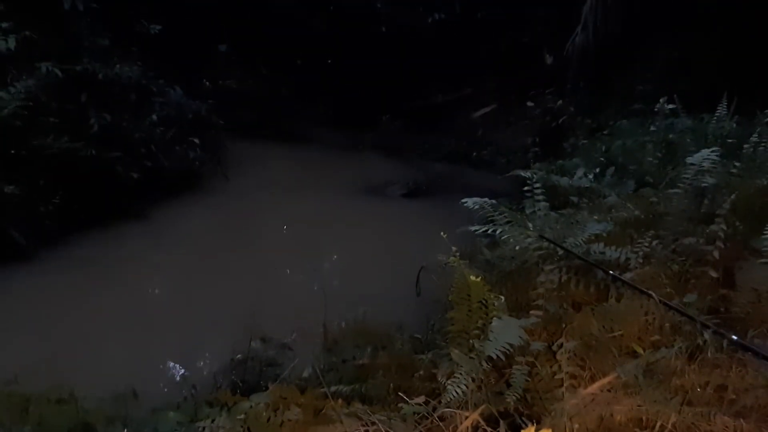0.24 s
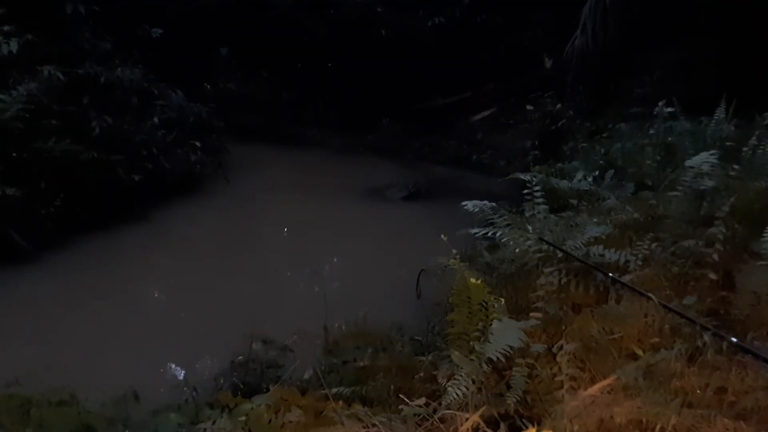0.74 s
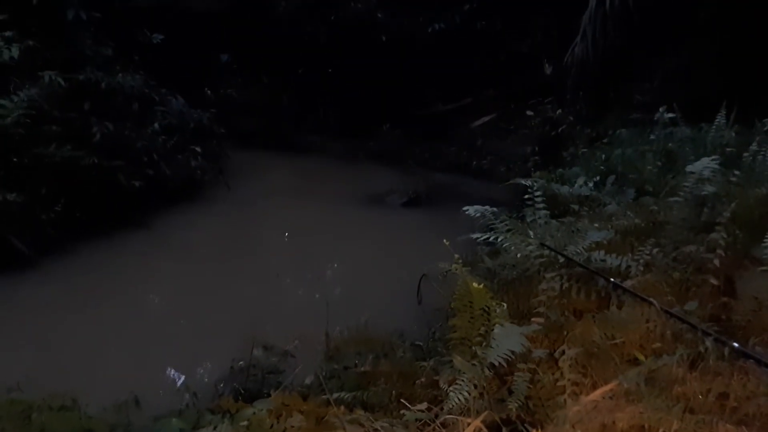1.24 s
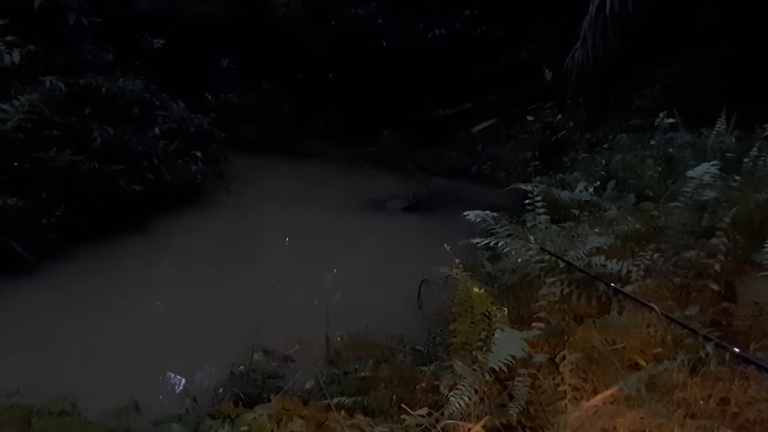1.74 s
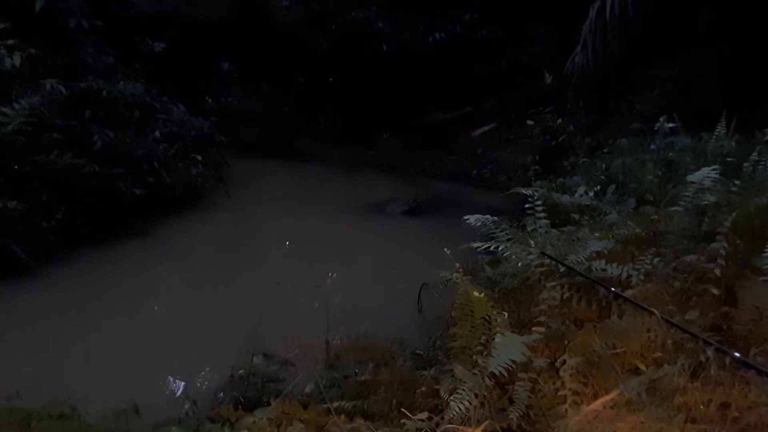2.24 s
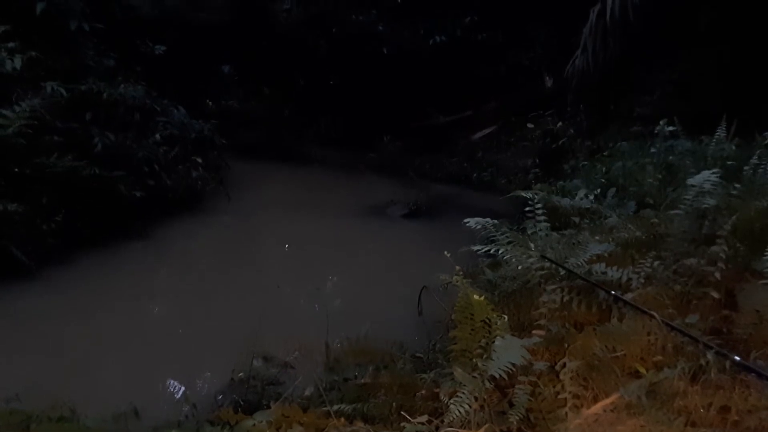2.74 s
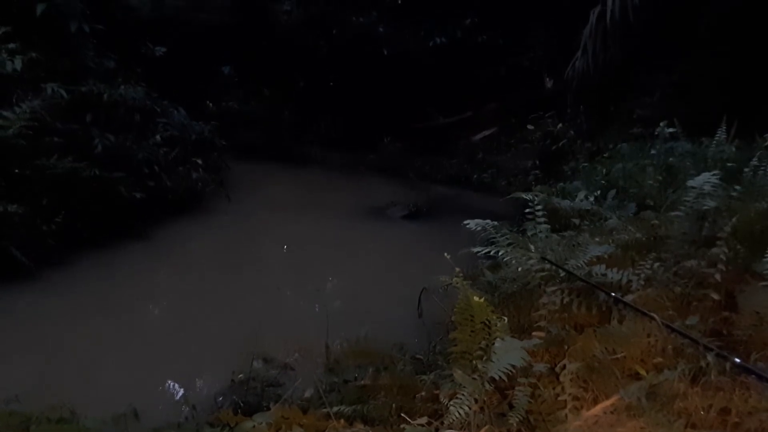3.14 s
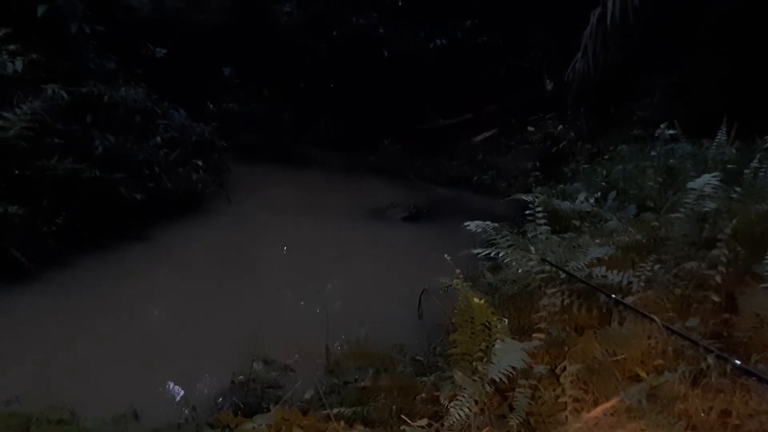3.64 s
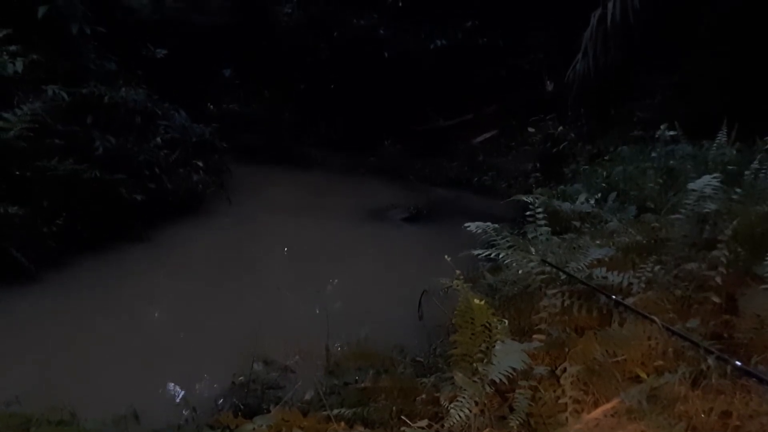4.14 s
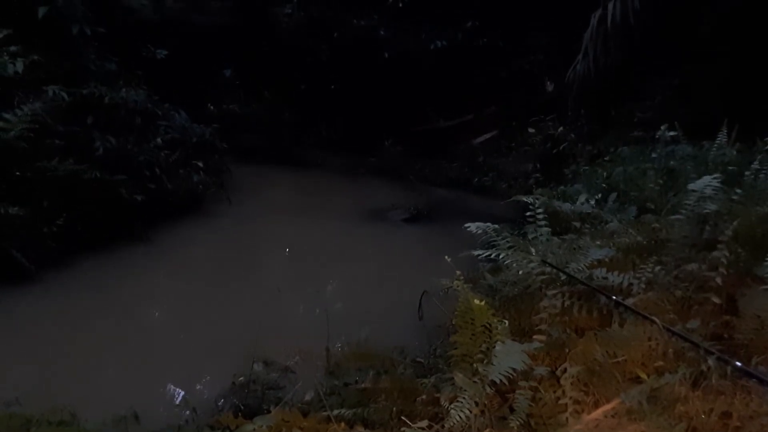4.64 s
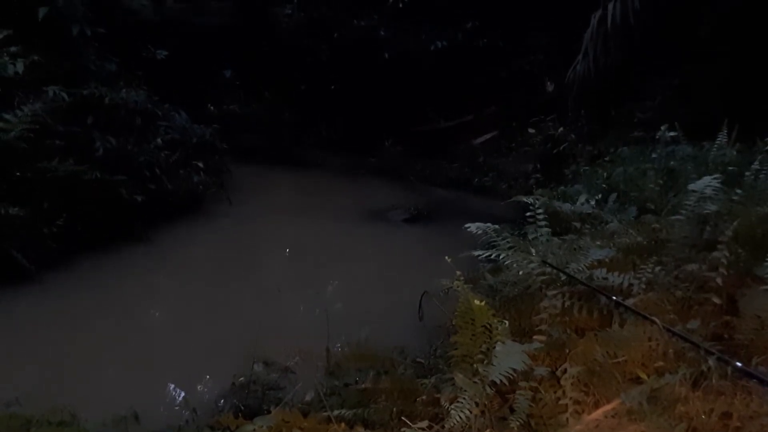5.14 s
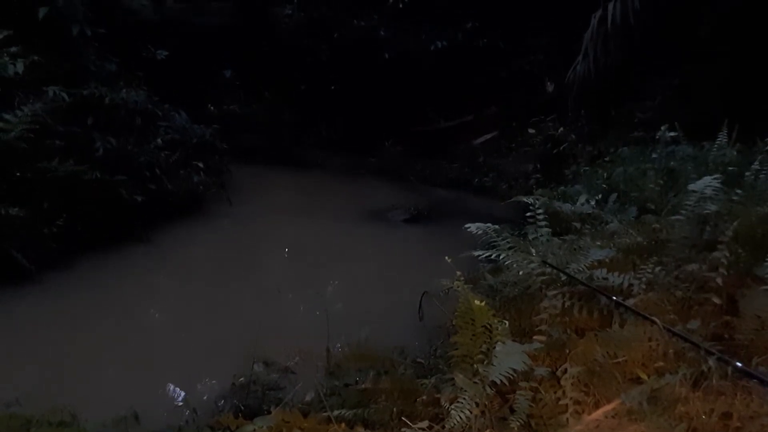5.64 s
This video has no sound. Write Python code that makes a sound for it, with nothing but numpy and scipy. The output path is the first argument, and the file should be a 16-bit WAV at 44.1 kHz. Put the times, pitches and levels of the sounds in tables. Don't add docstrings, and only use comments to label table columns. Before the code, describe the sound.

A dark waterside grove at night, heard in wide stereo. A low, reedy insect drone and high cricket trills run throughout, with fast chirps and raspy pulses. Around one second a close caller gives six dry rattles, left of centre; from four seconds short two-note frog pips come regularly, getting stronger to the end. A very faint engine rumbles far away.

```python
import sys
import numpy as np
from scipy import signal
from scipy.fft import rfft, irfft
from scipy.io import wavfile
from scipy.ndimage import map_coordinates

SR = 44100
rng = np.random.default_rng(int(sys.argv[2]) if len(sys.argv) > 2 else 0)


def pcm_store(signal):
    levels = np.round(np.clip(np.atleast_2d(signal), -1, 1) * 32767)
    wavfile.write(sys.argv[1], SR, levels.astype(np.int16).T)


def level_to_linear(level):
    exponent = np.asarray(level, float) / 20
    return 10 ** exponent


N = 260190


def in_time(rows):
    s, *columns = np.transpose(rows)
    return [np.interp(np.arange(N) / SR, s, c) for c in columns]


def at_hz(points, hz):
    points = np.array(points)
    return np.interp(np.log(hz + 1), np.log(points[:, 0]), points[:, 1])


def rms_one(x):
    return x / np.sqrt(np.mean(x ** 2) + 1e-20)


def drift(rate):
    coarse = np.arange(0, N + 32, 32)
    slow = map_coordinates(rng.standard_normal(3000), [coarse * rate / SR], order=3)
    return np.interp(np.arange(N), coarse, rms_one(slow))


def phrases(rows, fade_db_per_s, rest_db):
    t = np.arange(N) / SR
    held = []
    for s, length_s, db in rows:
        outside_s = np.maximum(0, np.maximum(s - t, t - s - length_s))
        held.append(db - fade_db_per_s * outside_s)
    return np.maximum(np.max(held, axis=0), rest_db)


def place(x, pan_db, lag_ms):
    at = np.arange(len(x))
    late = np.interp(at - np.round(lag_ms * SR / 1000), at, x)
    return np.array([late * level_to_linear(pan_db / 2), x * level_to_linear(-pan_db / 2)])


def grove(x, gap_s):
    t60_s = 0.7
    t = np.arange(SR) / SR
    cloud = rng.standard_normal((2, SR)) * level_to_linear(-60 * t / t60_s) * (t > gap_s)
    unit_energy = rms_one(cloud) / np.sqrt(SR)
    return signal.fftconvolve(x, unit_energy, axes=1)[:, :N]


def shaped_noise(spectrum, likeness):
    hz = np.fft.rfftfreq(N, 1 / SR)
    mid, side = rfft(rng.standard_normal((2, N)))
    alike = np.clip(at_hz(likeness, hz), -1, 1)
    both = np.sqrt(1 + alike) * mid + np.sqrt(1 - alike) * side * [[1], [-1]]
    return rms_one(irfft(both * level_to_linear(at_hz(spectrum, hz)), N))


def chorus(singers, level_db, wander_rate, flicker_db, wet_db):
    out = 0
    for carrier_hz, per_s, decay, glide_hz, wander_hz, db, pan_db, lag_ms in singers:
        stroke = np.cumsum(per_s * (1 + .02 * drift(4.0))) / SR % 1
        hz = carrier_hz + glide_hz * (stroke - .3) + wander_hz * drift(wander_rate)
        swell = np.sin(np.pi * stroke) ** 1.75 * np.exp(-decay * stroke)
        voice = rms_one(swell * np.sin(2 * np.pi * np.cumsum(hz) / SR))
        out = out + place(voice * level_to_linear(db + flicker_db * drift(9.0)), pan_db, lag_ms)
    direct = rms_one(out) * level_to_linear(level_db + 5.0) / np.sqrt(1 + level_to_linear(2 * wet_db))
    return np.array([direct, level_to_linear(wet_db) * direct])


def glides(events, from_hz, to_hz, length_s, lag_ms, wet_db, db=0.0, after_s=0.0):
    out = np.zeros((2, N + SR))
    u = np.linspace(0, 1, round(length_s * SR))
    change = rng.normal(0, 0.006, (len(events), 1))
    shape = np.sin(np.pi * u) ** 2 * np.exp(1 - 2 * u)
    for (s, peak_db, pan_db), detune in zip(events, change):
        hz = (from_hz + (to_hz - from_hz) * u) * (1 + detune)
        note = np.sin(2 * np.pi * np.cumsum(hz) / SR) * shape
        at = round((s + after_s) * SR)
        out[:, at:at + len(u)] += place(note * level_to_linear(peak_db + db), pan_db, lag_ms)
    return np.array([out[:, :N], level_to_linear(wet_db) * out[:, :N]])


def strokes(bursts, gap_s, pan_db, uneven_db, growth_db):
    luck = rng.normal(0, 1, (len(bursts), 8, 3))
    rows = []
    for i, (s, length_s, db) in enumerate(bursts):
        for k in range(round(length_s / gap_s) + 1):
            timing, strength, side = luck[i, k]
            start_s = s + gap_s * (k + .06 * timing * (k > 0))
            level_db = db + growth_db * k + uneven_db * strength
            rows.append((start_s, level_db, pan_db + 2.4 * side))
    return rows


# time_s, level_db
RUMBLE_LEVEL = [(0, -71.5), (.9, -75), (1.5, -68), (2.2, -74), (2.85, -72.5), (3.5, -72), (3.9, -74),
                (4.5, -74.5), (4.9, -71.5), (5.9, -71.5)]
# frequency_hz, density_db
RUMBLE_SPECTRUM = [(15, -53.5), (25, -30), (46, -5.5), (65, 1), (134, -9), (409, -24.5), (818, -36),
                   (1000, -35.5), (1300, -33.5), (2200, -120)]
# frequency_hz, left_right_likeness
LOW_LIKENESS = [(60, .9), (130, .62), (290, .36), (640, .05)]


def rumble():
    level_db = in_time(RUMBLE_LEVEL)[0] + 1.8 * drift(3.4)
    return level_to_linear(level_db) * shaped_noise(RUMBLE_SPECTRUM, LOW_LIKENESS) * level_to_linear([[-2.5], [2.1]])


# start_s, length_s, level_db
HUM_SWELLS = [(.36, 0.55, -71.5), (.97, 0.07, -66), (1.6, .08, -64.5), (1.85, 0.077, -66), (2.53, .85, -62),
              (3.8, 0.06, -67), (4.68, 0.04, -65), (5.0, .5, -71)]


def hum():
    line = np.sin(2 * np.pi * np.cumsum(63 + 1.58 * drift(2.9)) / SR)
    return place(line * level_to_linear(phrases(HUM_SWELLS, 110, rest_db=-74) - 5.5), -7.0, .01)


# start_s, length_s, level_db
BREEZE = [
    (0, .1, -88),
    (1.1, 1.2, -83),
    (4.75, 0.3, -79),
]
# frequency_hz, density_db
FERN_SPECTRUM = [(100, -34), (200, 0), (500, -3.5), (1000, -8.5), (1500, -43)]


def ferns():
    level_db = phrases(BREEZE, 30, rest_db=-100) + 2.5 * drift(5.1)
    return level_to_linear(level_db) * shaped_noise(FERN_SPECTRUM, LOW_LIKENESS)


# frequency_hz, density_db
FAR_SPECTRUM = [(950, -28.5), (1250, -3), (1900, 7), (2400, -6), (3500, -11), (3980, -16.5), (4500, -10),
                (6000, -8.5), (6420, -18), (7600, -11), (8600, -14), (9250, -45), (11000, -40.5),
                (12200, -28), (15500, -23.5)]
# frequency_hz, left_right_likeness
UNALIKE = [(1000, -0.089), (16000, 0.007)]


def far_chorus():
    return level_to_linear(-50.5) * shaped_noise(FAR_SPECTRUM, UNALIKE) * level_to_linear([[-1.2], [1.2]])


# start_s, length_s, level_db
HISS_SWELLS = [(.8, 0.083, -82), (1.05, 0.86, -78), (2.0, 0.29, -83.5), (3.75, .1, -92), (4.15, .35, -85),
               (4.88, 0.073, -79), (5.1, 0.16, -88), (5.75, .15, -86.5)]
# frequency_hz, density_db
HISS_SPECTRUM = [(8600, -18.5), (9200, 1), (11500, -2), (13000, -7), (14000, -39.5)]


def high_hiss():
    return level_to_linear(phrases(HISS_SWELLS, 66, rest_db=-105) + 10.0) * shaped_noise(HISS_SPECTRUM, UNALIKE)


# time_s, pitch_hz, level_db
SQUEAKS = [
    [(1.86, 11700, -80), (1.93, 12000, -76), (2.04, 11950, -76), (2.08, 12400, -75), (2.12, 13500, -80)],
    [(4.9, 15600, -80), (4.94, 14600, -78), (4.965, 13200, -76), (4.99, 12000, -82)],
    [(4.955, 14400, -80), (5.0, 13400, -78), (5.04, 12400, -82), (5.07, 12700, -79), (5.11, 12300, -82)],
    [(4.85, 12200, -80), (4.86, 12550, -73), (4.885, 12550, -72), (4.89, 13500, -68), (4.91, 13650, -66),
     (4.93, 12800, -68), (4.96, 10500, -79)],
]


def squeaks():
    out, t = 0, np.arange(N) / SR
    for rows in SQUEAKS:
        hz, db = in_time(rows)
        on = (t > rows[0][0]) & (t < rows[-1][0])
        out = out + on * level_to_linear(db + 6.5) * np.sin(2 * np.pi * np.cumsum(hz) / SR)
    return place(out, 4.0, .2)


# carrier_hz, strokes_per_s, decay_per_stroke, glide_hz_per_stroke, wander_hz,
# level_db, left_minus_right_db, left_lag_ms
WHINERS = [(13900, 72, 1.2, 0, 35, 0, -1.5, -.2), (13870, 44, 1.2, 0, 35, -1.5, 1.5, .2)]
# start_s, length_s, level_db
WHINE_PHRASES = [(.56, 0.34, -84), (1.33, .27, -82), (2.2, 0.27, -88), (2.99, 0.26, -92), (3.79, .25, -83),
                 (4.47, .26, -82), (5.36, 0.25, -83)]


def whiners():
    return chorus(WHINERS, phrases(WHINE_PHRASES, 350, rest_db=-100), 92.0, flicker_db=1.5, wet_db=1.5)


BUZZERS = [(8350, 132, 3.5, -250, 70, 0, 5, .3)]
# start_s, length_s, level_db
BUZZ_PHRASES = [
    (0, 1.7, -72.5),
    (1.3, 0.27, -62),
    (2.6, 0.32, -75.5),
    (4.8, 0.078, -85),
    (5.7, .2, -73),
]


def buzzers():
    return chorus(BUZZERS, phrases(BUZZ_PHRASES, 27, rest_db=-100.5), 200.0, flicker_db=3.5, wet_db=2.5)


PURRERS = [(3387, 57, 4.5, -300, 140, 3.5, -6, 0.28), (2630, 47, 0.81, 149, 130, 3, -9, 0.087)]
# start_s, length_s, level_db
PURR_PHRASES = [
    (0, 0.21, -67),
    (1.9, 0.25, -63.5),
    (4.1, 0.77, -62),
    (5.3, .6, -64),
]


def purrers():
    return chorus(PURRERS, phrases(PURR_PHRASES, 12.6, rest_db=-71.5), 80.0, flicker_db=1.7, wet_db=17.0)


RASPERS = [(5390, 54, 0.83, -500, 200, -5.5, -5, 0.21), (4993, 62, 1.2, -600, 220, 0, -3.5, -.2),
           (5780, 39, 1.7, -700, 200, -0.5, -4.5, .1)]
# start_s, level_db
RASP_BOUTS = [(.04, -55), (.28, -58.5), (.5, -69), (.69, -63), (.86, -64), (1.1, -56), (1.52, -57),
              (1.76, -60), (2.01, -58), (2.23, -59), (2.46, -57.5), (2.72, -86), (2.97, -71), (3.2, -60),
              (3.4, -62), (3.62, -59), (3.81, -56.5), (4.04, -57), (4.24, -54.5), (4.43, -55), (4.64, -59),
              (4.87, -63.5), (5.07, -61), (5.27, -61.5), (5.48, -55.5), (5.7, -59.5)]


def raspers():
    bouts = [(s, 0.037, db) for s, db in RASP_BOUTS]
    return chorus(RASPERS, phrases(bouts, 160, rest_db=-61), 60.0, flicker_db=3.5, wet_db=3.0)


CRICKETS = [(6935, 34, 9.9, 240, 56, -0.5, -7, .2), (7120, 57, 1.7, 180, 63.2, -5, -2.5, .15),
            (7140, 32, 2.6, 220, 46, -13, -4, -.2)]
# time_s, level_db
CRICKET_LEVEL = [(0, -70.5), (.55, -64.5), (.95, -65.5), (1.5, -64), (2.1, -66.5), (2.35, -67.5),
                 (2.8, -68), (3.05, -64), (3.4, -67.5), (3.9, -64.5), (5.9, -63)]


def crickets():
    throbs_per_s, throb_db = 12, 3.0
    phase = 2 * np.pi * throbs_per_s * np.arange(N) / SR + 0.32 * drift(1.0)
    level_db = in_time(CRICKET_LEVEL)[0] + throb_db * np.cos(phase)
    return chorus(CRICKETS, level_db, 150.0, flicker_db=2.0, wet_db=-3.5)


DRONERS = [(1530, 88, 1.2, 0, 22, 0, -6, .4), (1618, 95, 2.2, 0, 22, 1.5, -4, .44),
           (1575, 79, 2.2, 0, 50, -4, -7, .15), (1713, 90, 2.2, 0, 30, -7, -4.5, .2),
           (1600, 60, 2.2, 0, 40, -5, .6, -.45)]
# time_s, level_db
DRONE_LEVEL = [(0, -39.5), (.3, -39.5), (1.4, -41), (2.65, -41), (2.8, -43.5), (3.12, -38.5), (3.3, -43),
               (3.8, -39.5), (4.0, -42), (4.75, -40), (5.4, -39), (5.55, -37.5), (5.9, -37)]


def drone():
    body_hz, width_hz = 1628, 486
    song = chorus(DRONERS, in_time(DRONE_LEVEL)[0], 25.0, flicker_db=1.5, wet_db=0.0)
    b, a = signal.iirpeak(body_hz, body_hz / width_hz, SR)
    return level_to_linear(-1.5) * signal.lfilter(b, a, signal.lfilter(b, a, song))


def chirper():
    first_s, every_s, gap_s = .02, .2245, .033
    bursts = [(s, 2 * gap_s, -59) for s in np.arange(first_s, N / SR, every_s)]
    rows = strokes(bursts, gap_s, pan_db=-4.0, uneven_db=2.0, growth_db=0.2)
    return glides(rows, 5050, 4000, .024, .2, wet_db=-4.0, after_s=-.004)


# start_s, length_s, peak_db
KATYDID_BURSTS = [(1.162, .06, -53), (2.601, .06, -59.5), (2.939, .06, -54), (3.745, .06, -53),
                  (4.793, .06, -54.5), (4.926, .04, -58), (5.74, .06, -53)]
# start_s, length_s, peak_db
TICK_BURSTS = [
    (.797, .068, -56),
    (1.044, .034, -58),
    (1.254, .068, -59.5),
    (4.18, .068, -59),
    (4.39, .068, -61),
]


def katydids():
    calls = strokes(KATYDID_BURSTS, .02, pan_db=9.5, uneven_db=1.0, growth_db=-0.3)
    ticks = strokes(TICK_BURSTS, .034, pan_db=5.0, uneven_db=2.5, growth_db=1.5)
    return (glides(calls, 9310, 6920, 0.013, -0.22, wet_db=-2.0)
            + glides(ticks, 15700, 14300, 0.009, -.1, wet_db=-3.0)
            + glides(ticks, 10500, 9600, .009, -.1, wet_db=-6.0, db=-12.0))


# start_s, peak_db, left_minus_right_db
TAPS = [
    (2.684, -62.5, -0.5),
    (4.899, -61, -2),
]


def taps():
    return glides(TAPS, 700, 300, 0.0023, .05, wet_db=-8.0)


# low_note_s, upstroke_db, low_note_db
FROGS = [(0.065, -58, -51), (2.299, -56, -53.5), (3.27, -59, -51), (3.742, -61, -48), (4.0956, -55, -44),
         (4.3011, -52, -41.5), (4.5072, -46.5, -37), (4.6867, -45.5, -37), (4.845, -39, -35),
         (5.0421, -41.5, -37), (5.2076, -40, -37), (5.3878, -38.5, -37.5), (5.5659, -37, -36),
         (5.7192, -43, -36.5), (5.8874, -37.5, -37)]
# start_s, peak_db, left_minus_right_db
PEEPS = [
    (3.585, -52, -8),
    (4.923, -46, -10),
    (5.5303, -42.5, -10),
    (5.7518, -47.5, -12),
]
FAR_PEEPS = [
    (.168, -58, -6),
    (.308, -53, -8),
    (.455, -62, -8),
    (.61, -54, -7),
    (.75, -66, -8),
]
FALLS = [
    (3.352, -49.5, -4),
    (3.535, -57, -12),
]


def frogs():
    lead_s, pan_db = 0.02, -3
    high = [(s - lead_s, db, pan_db) for s, db, _ in FROGS]
    low = [(s, db, pan_db) for s, _, db in FROGS]
    return (glides(high, 2150, 2900, 0.016, .1, wet_db=-5.0, db=2.5, after_s=-.004)
            + glides(high, 2650, 2480, 0.016, .1, wet_db=2.5, db=-1.5, after_s=.008)
            + glides(low, 2000, 2090, 0.028, .1, wet_db=-3.0, after_s=-.008)
            + glides(low, 3950, 4200, 0.02, .1, wet_db=1.5, db=-16.0, after_s=-0.0077)
            + glides(PEEPS, 2600, 3050, 0.026, .1, wet_db=-8.0, after_s=-0.003)
            + glides(FAR_PEEPS, 2623, 2840, 0.036, .1, wet_db=-1.0)
            + glides(FALLS, 3000, 2300, 0.047, .1, wet_db=-1.0))


# start_s, peak_db, left_minus_right_db
RATTLES = [
    (1.032, -26.5, 3.1),
    (1.1847, -26.5, 5.7),
    (1.3413, -26, 6.3),
    (1.492, -24, 2.0),
    (1.6675, -24.5, 0.52),
    (1.8337, -25, 0.95),
]
# frequency_hz, level_db, t60_s
RATTLE_BODY = [(1290, -26, 0.005), (2120, -9.5, 0.0071), (2530, -7, 0.0057), (2854, -1.5, 0.0038),
               (3480, -0.5, 0.0096), (3896, -3, .005), (4340, -5.5, 0.0051), (4945, -11.5, 0.0038),
               (10100, -26, 0.012), (11900, -39, 0.015)]


def rattler():
    clicks, t = np.zeros((2, N)), np.arange(1300) / SR
    for s, db, pan_db in RATTLES:
        sparse = rng.standard_normal(len(t)) * (rng.random(len(t)) < .3)
        run = rms_one(sparse) * np.exp(-(t / .022) ** 4)
        sides_db = np.array([[pan_db], [-pan_db]]) / 2
        clicks[:, round(s * SR) - 60:][:, :len(t)] += run * level_to_linear(db - 15 + sides_db)
    out = 0
    for k, (hz, db, t60) in enumerate(RATTLE_BODY):
        r, w = level_to_linear(-60 / (t60 * SR)), 2 * np.pi * hz / SR
        mode = signal.lfilter([0, np.sin(w)], [1, -2 * r * np.cos(w), r * r], clicks + 1e-18)
        out = out + (-1) ** k * level_to_linear(db) * mode
    out = signal.sosfilt(signal.butter(5, 1250, "high", fs=SR, output="sos"), out)
    out = signal.sosfilt(signal.butter(2, [5500, 9300], "bandstop", fs=SR, output="sos"), out)
    out[1] = np.roll(out[1], 6)
    far_part = signal.sosfilt(signal.butter(2, [2600, 4800], "band", fs=SR, output="sos"), out)
    return out + level_to_linear(-5.5) * grove(far_part, .014)


def scene():
    background = rumble() + hum() + ferns() + far_chorus() + high_hiss()
    steady = whiners() + buzzers() + purrers() + raspers() + crickets() + drone()
    direct, sent = steady + chirper() + katydids() + taps() + frogs()
    return background + squeaks() + direct + grove(sent, 0.0064) + rattler()


def band_limit(x):
    return signal.sosfilt(signal.butter(12, 15880, fs=SR, output="sos"), x)


def record(dry):
    cut = signal.sosfilt(signal.cheby2(16, 50, 16300, fs=SR, output="sos"), dry)
    return band_limit(cut)


dry = scene()
out = record(dry)
pcm_store(out)
```